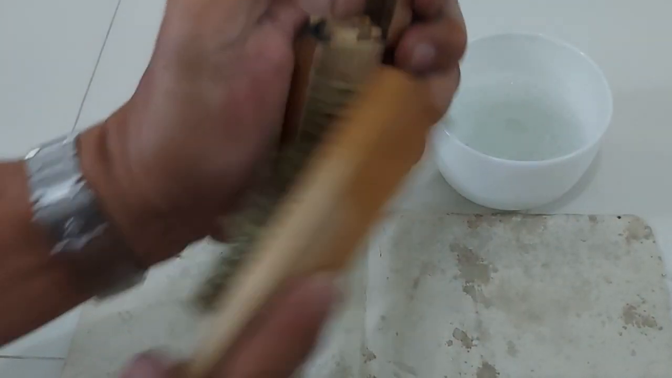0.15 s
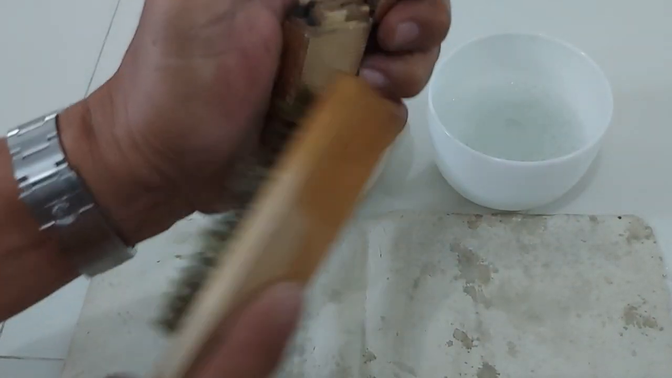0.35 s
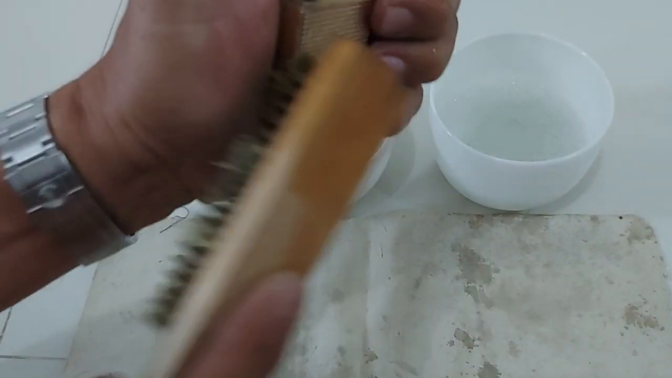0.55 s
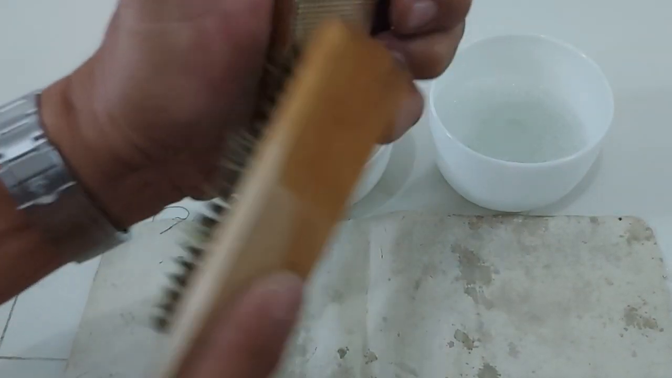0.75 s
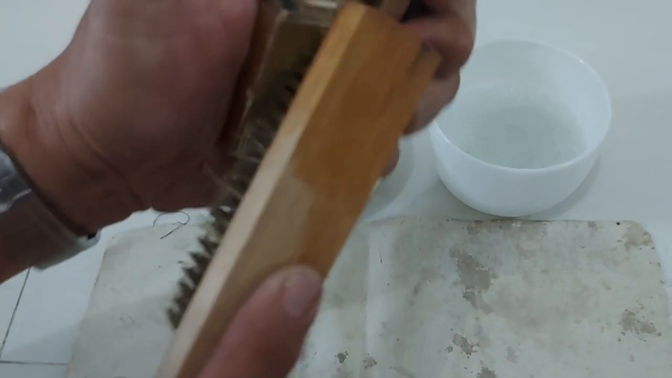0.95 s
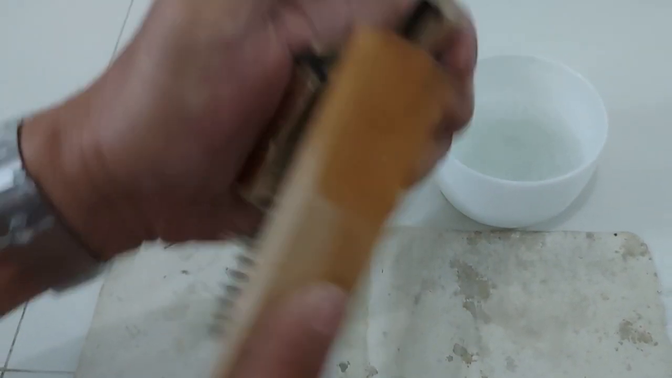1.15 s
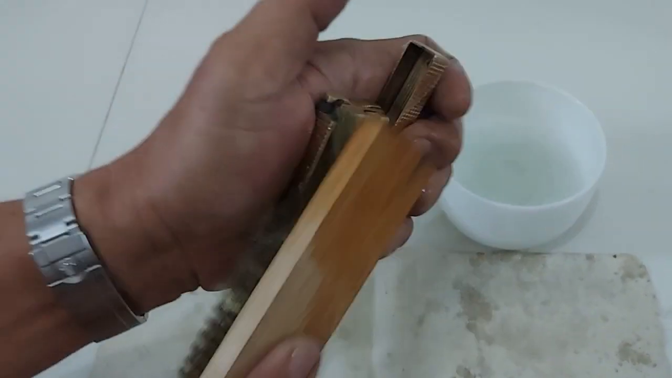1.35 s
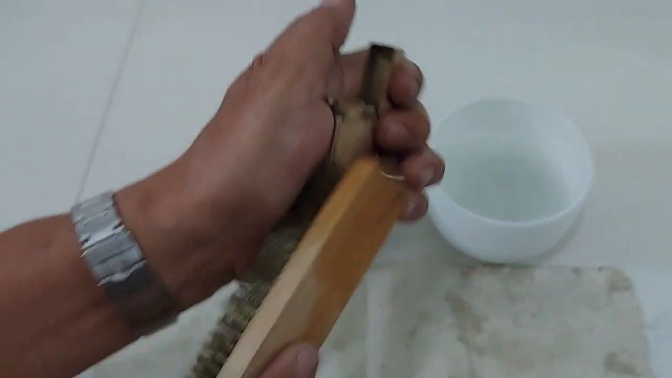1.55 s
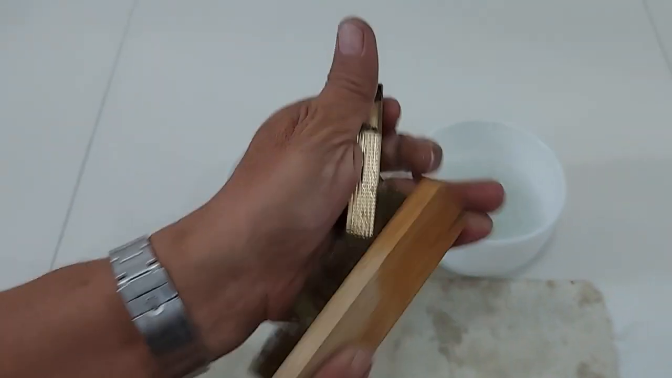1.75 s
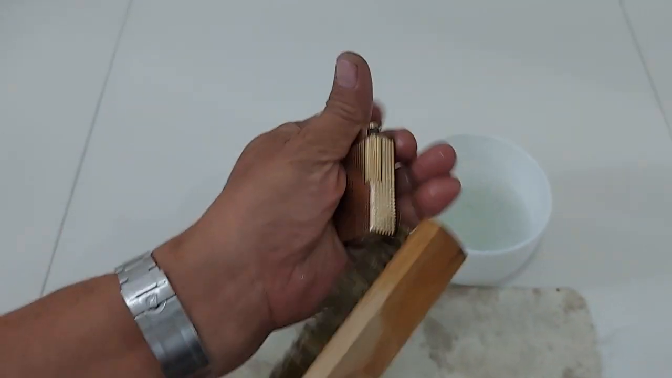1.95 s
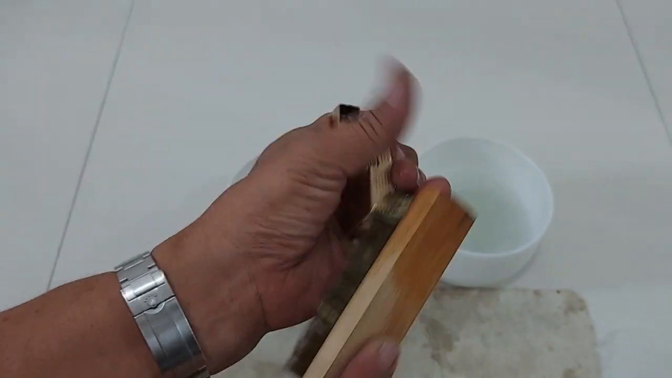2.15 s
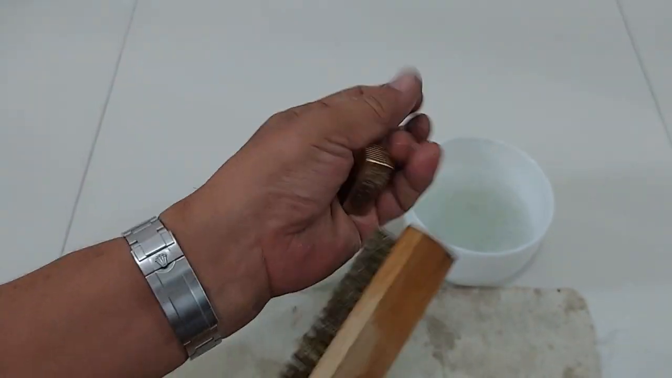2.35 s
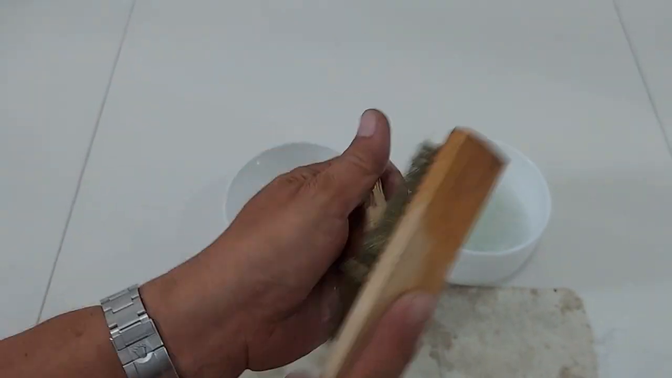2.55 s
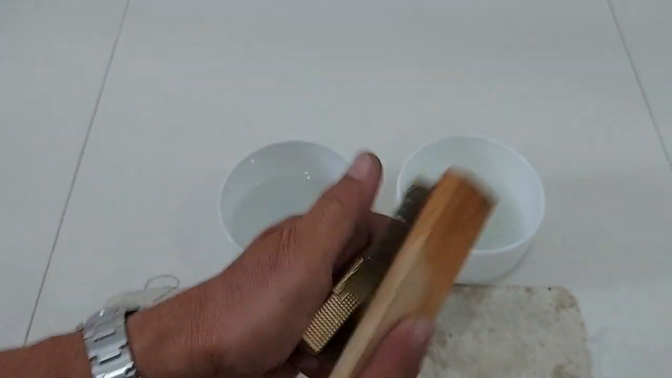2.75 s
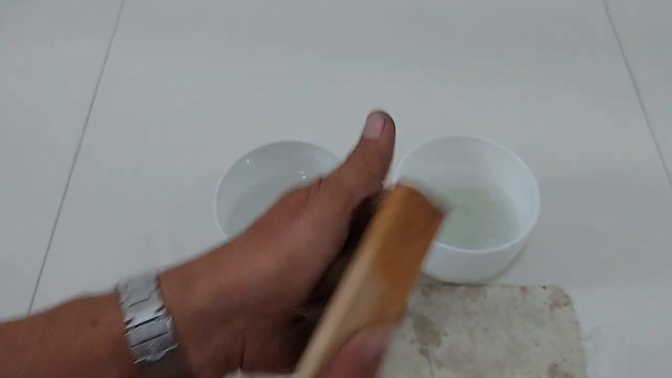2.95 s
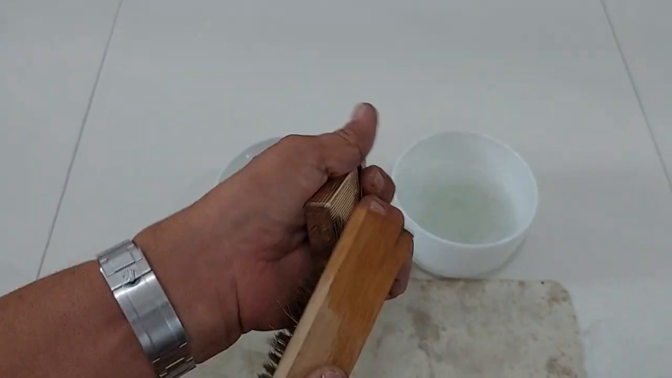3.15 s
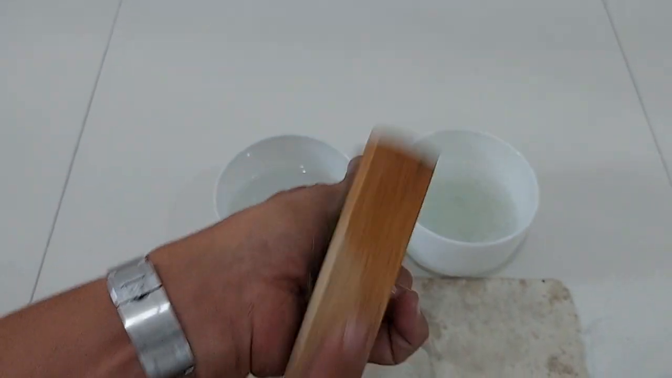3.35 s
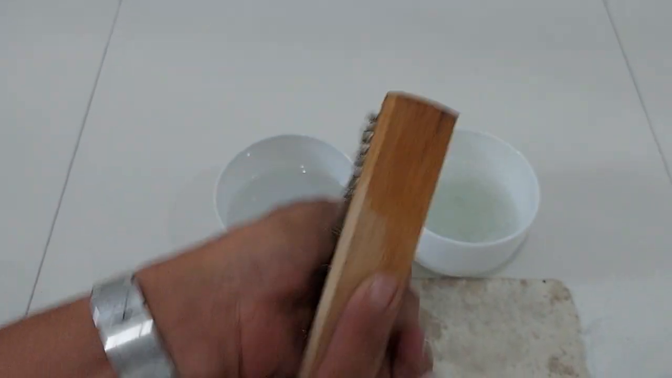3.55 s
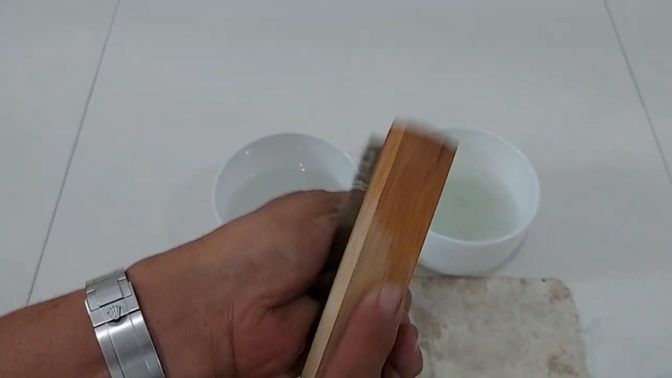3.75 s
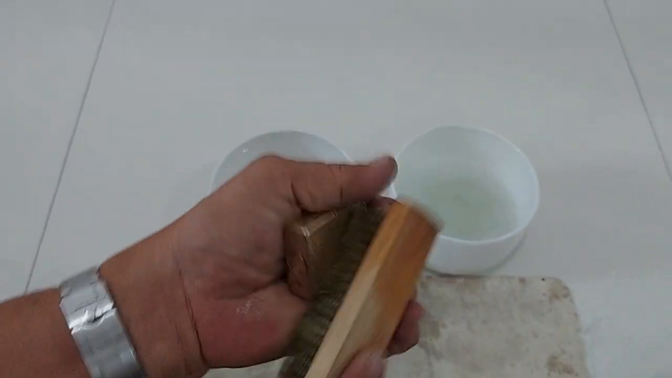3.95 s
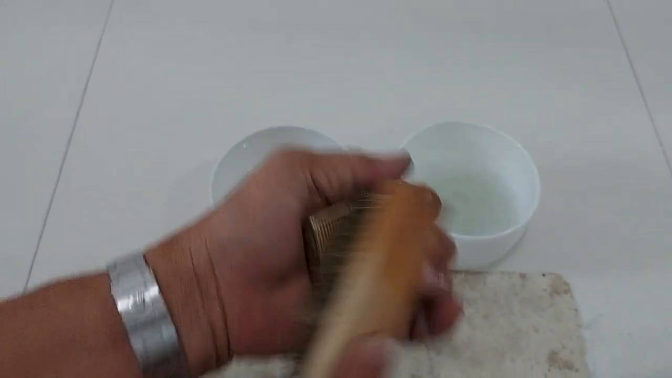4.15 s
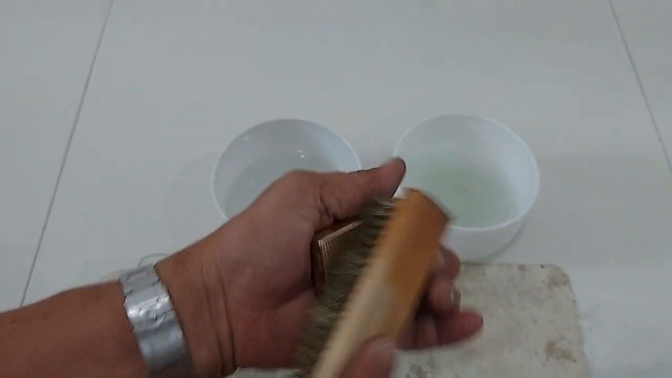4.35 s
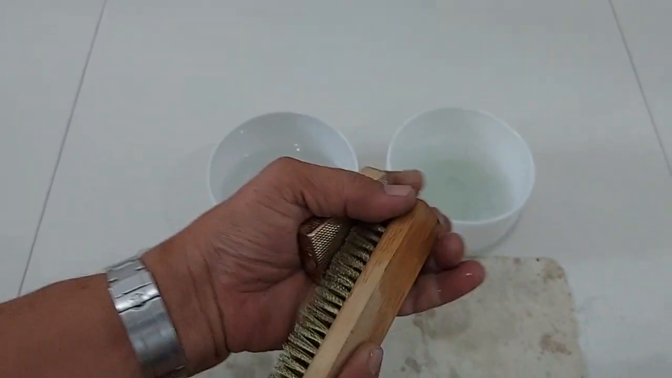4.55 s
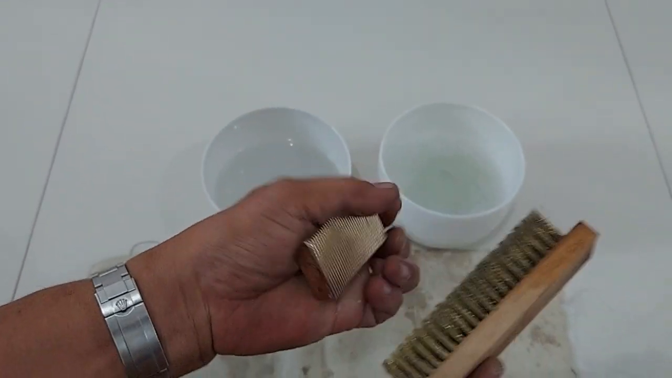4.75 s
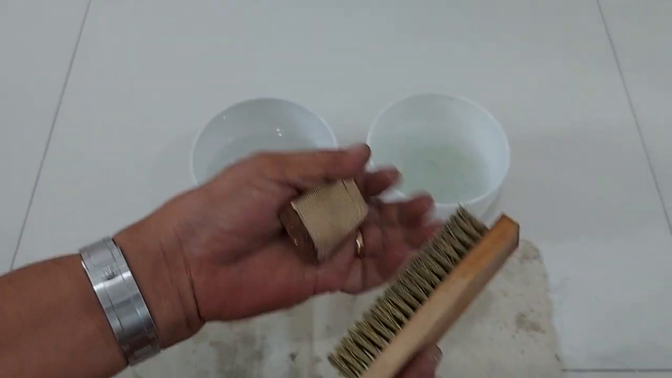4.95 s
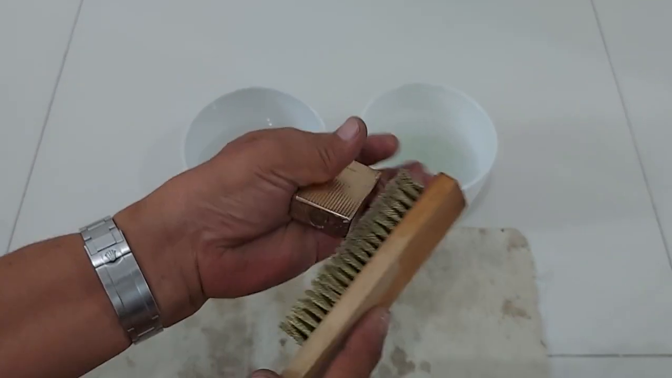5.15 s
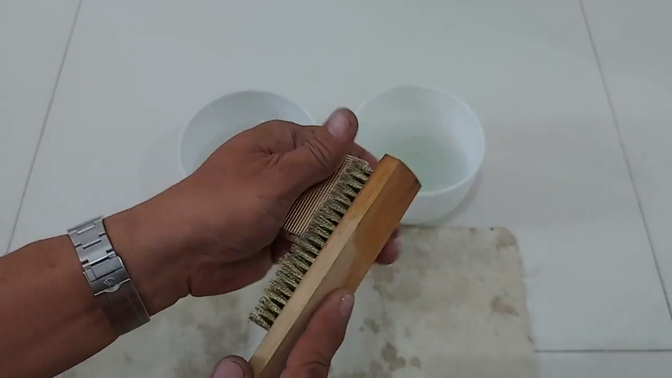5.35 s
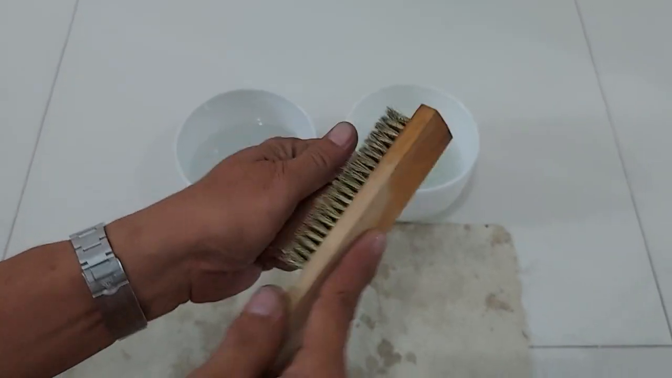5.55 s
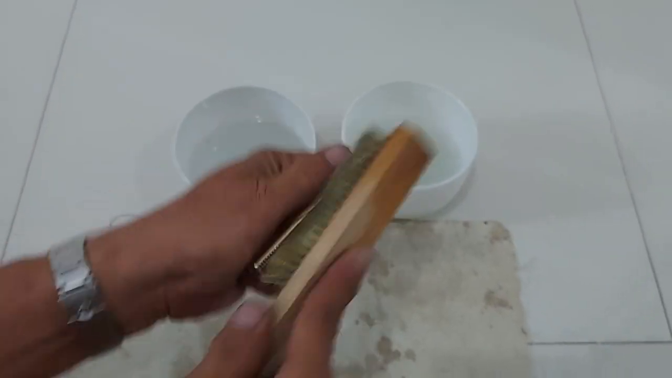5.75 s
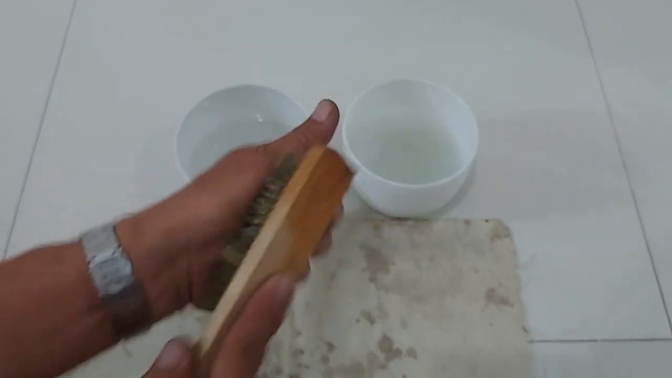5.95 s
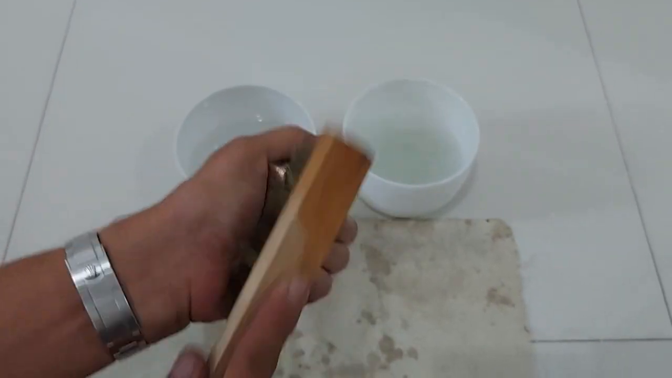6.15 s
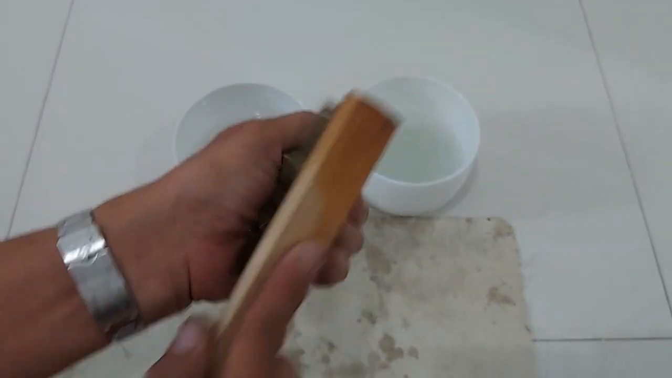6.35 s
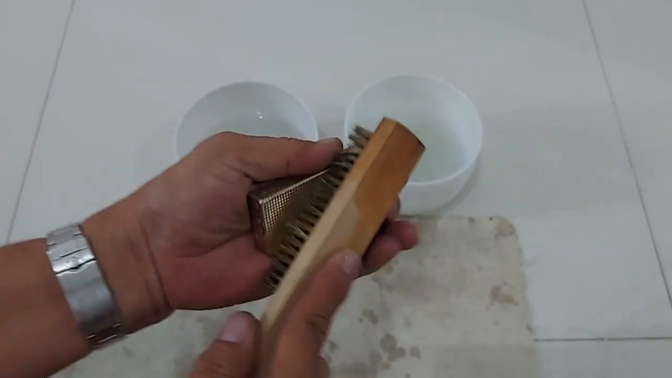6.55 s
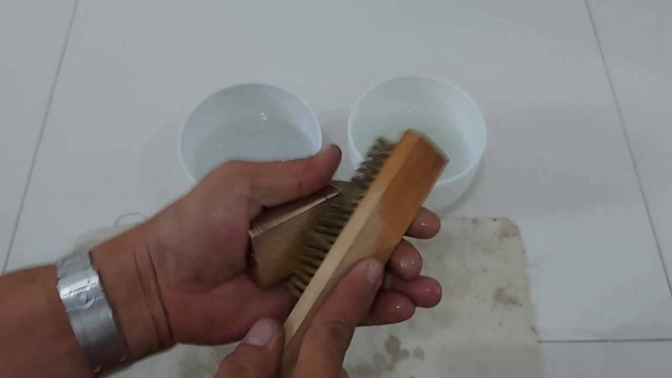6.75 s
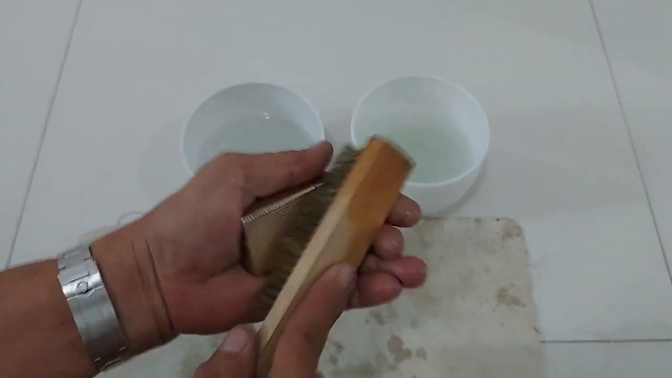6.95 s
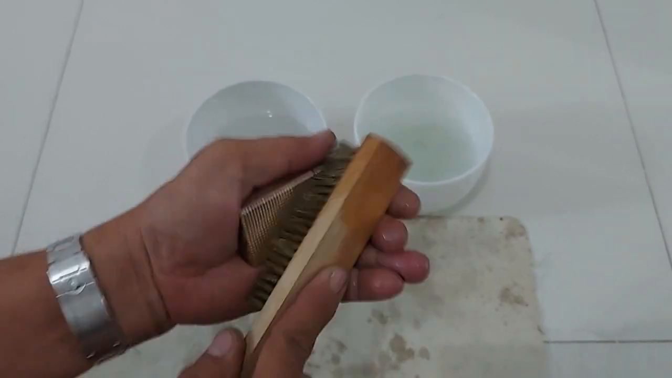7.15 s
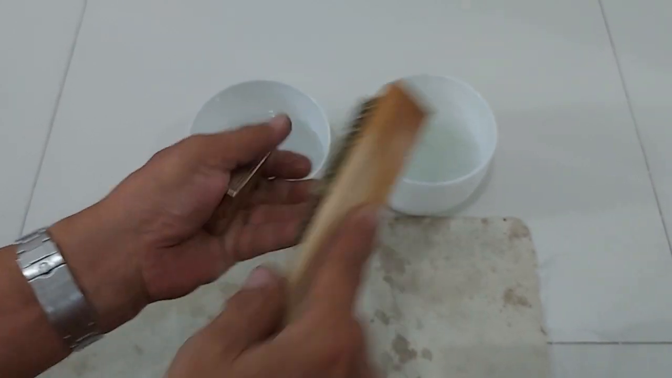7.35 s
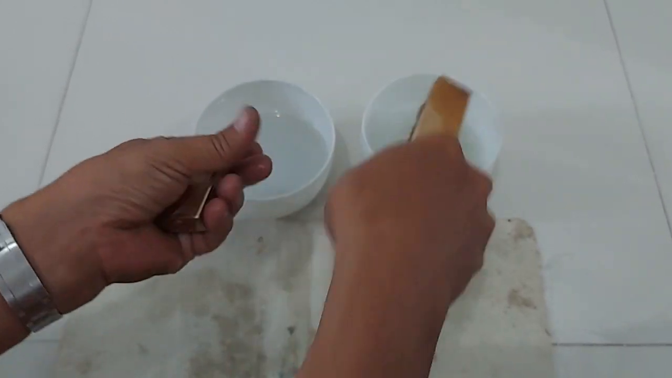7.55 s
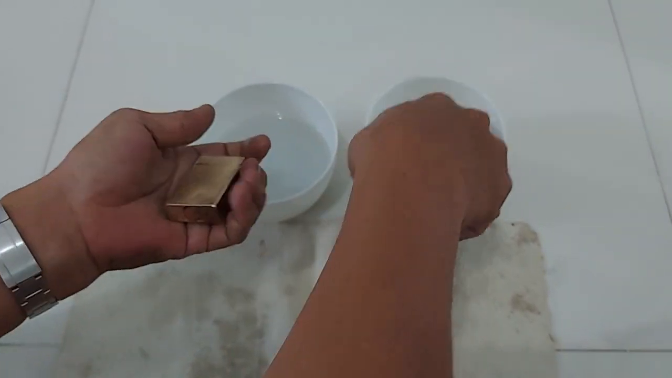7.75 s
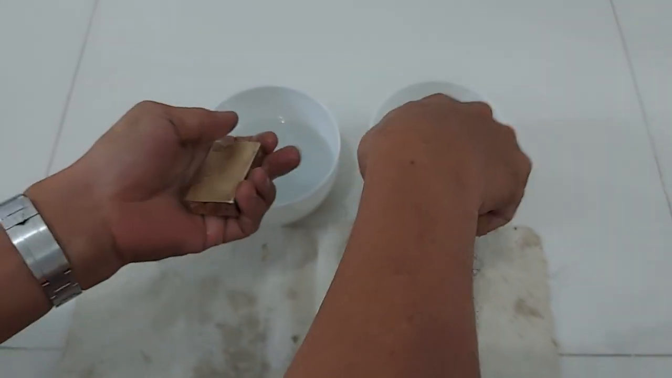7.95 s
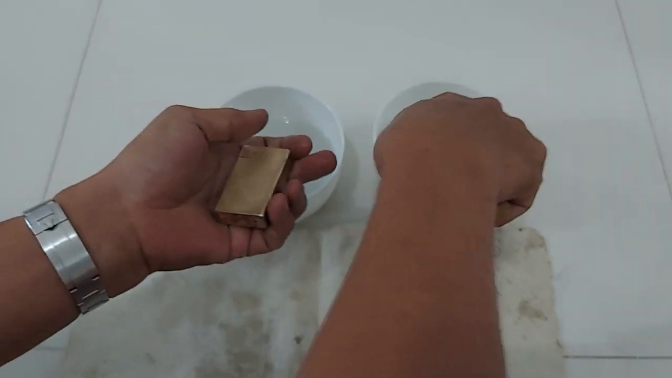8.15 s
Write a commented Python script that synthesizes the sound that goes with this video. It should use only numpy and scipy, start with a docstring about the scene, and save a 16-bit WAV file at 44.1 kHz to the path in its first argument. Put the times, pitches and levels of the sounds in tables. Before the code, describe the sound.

Close stereo sound in a hard, tiled room with a short bright echo; a low, wavering traffic rumble and faint hiss lie behind. From 0 to 2 s a wire brush scrubs a small ribbed metal case in quick, uneven strokes, dry and gritty, with thin ringing around 3 kHz and sharp catches, notably at 0.8 s. Near 2.2 s the strokes break off; a sharp loud crack at 2.3 s leads into a rough fading drag. Scrubbing resumes from 2.75 to 4.6 s, strongest after 4.2 s. A near-silent gap follows, then a tick at 5.2 s and small squeaks. From 5.5 to 7.4 s brisk strokes return, growing louder and ringier, with a hard metallic catch near 7 s. After a pause, from 7.7 s wires clink on ringing glass, and the bowl bumps and grinds hollowly on tiles under a short swelling roar, fading by 8.2 s.

```python
"""In a hard-walled room, a wet wire brush scrubs a small ribbed metal case held in the hand.
Wire tips flick off the ribs in dense swarms of random clicks, which ring the case through resonances.
Catches, snaps, dull taps and thin squeals break in; at the end the brush goes into a glass bowl,
which rings and grinds on the tiles as a noisy roar swells. Outside, traffic rumbles: wavering sine
tones and filtered noise.
"""
import sys
import numpy as np
from scipy import signal
from scipy.fft import rfft, irfft, next_fast_len
from scipy.io import wavfile
from scipy.ndimage import uniform_filter1d

SR = 44100
rng = np.random.default_rng(int(sys.argv[2]) if len(sys.argv) > 2 else 0)


def pcm_store(signal):
    """Save signal as 16-bit PCM."""
    levels = np.round(np.clip(np.atleast_2d(signal), -1, 1) * 32767)
    wavfile.write(sys.argv[1], SR, levels.astype(np.int16).T)


N = 361179
T = np.arange(N) / SR  # time of every sample, in seconds

# Levels in the tables are relative: the functions below trim them further.
# The sound colour of the wire tips. Each row: frequency in Hz, level in dB per Hz.
SCRATCH = [(400, -31), (1200, -20), (2000, -4.5), (4500, -7.5), (5800, -9.5), (7500, -12.5), (9000, -8),
           (11000, -10), (13500, -7), (16000, -7)]


def from_db(db):
    """Turn decibels into a gain to multiply by."""
    return 10 ** (np.asarray(db) / 20)


def rms_one(x):
    """Scale a sound so that its average strength (rms) is 1."""
    return x / np.sqrt(np.mean(x ** 2) + 1e-20)


def in_time(rows, outside=None):
    """Draw straight lines between the rows of a table, giving each column a value at every sample."""
    s, *columns = np.transpose(rows)
    return [np.interp(T, s, column, outside, outside) for column in columns]


def coloured(x, spectrum, share=1):
    """Weight each frequency by a (Hz, dB) curve; share multiplies the decibels."""
    size = next_fast_len(N)
    hz, db = np.transpose(spectrum)
    log_hz = np.log(np.fft.rfftfreq(size, 1 / SR) + 1)
    gain = from_db(share * np.interp(log_hz, np.log(hz), db))
    return irfft(rfft(x, size) * gain, size)[..., :N]


def resonate(x, hz, width_hz):
    """Ring at one frequency, with gain 1 at the peak; a narrower resonance rings longer."""
    r = np.exp(-np.pi * width_hz / SR)
    feed = [(1 - r * r) / 2, 0, (r * r - 1) / 2]
    feedback = [1, -2 * r * np.cos(2 * np.pi * hz / SR), r * r]
    return signal.lfilter(feed, feedback, x + 1e-18)


def drift(rate_hz):
    """Slow random wander of spread 1: noise with everything faster than about rate_hz filtered away."""
    slow = signal.butter(2, rate_hz, fs=SR, output="sos")
    # The first second is dropped so the filter has settled.
    return rms_one(signal.sosfilt(slow, rng.standard_normal(N + SR))[SR:])


def body(x, modes, shift_db=0):
    """Add up resonances of alternating sign; each swells and fades as the contact point moves."""
    total = 0
    for k, (hz, width_hz, db) in enumerate(modes):
        gain = from_db(db + shift_db * drift(9.4))
        total = total + (-1) ** k * gain * resonate(x, hz, width_hz)
    return total


def swarm(per_s, spread_db, channels=1):
    """Many random clicks of uneven size and sign, scaled to rms 1."""
    shape = (channels, N)
    sizes = from_db(spread_db * np.minimum(rng.exponential(1, shape), 5))
    signs = rng.choice([-1, 1], shape)
    happens = rng.random(shape) < per_s / SR
    return rms_one(sizes * signs * happens)


def pair(draws, likeness):
    """Make left and right from three draws: they share the first and own one each."""
    alike = np.clip(likeness, 0, 1)
    return np.sqrt(alike) * draws[0] + np.sqrt(1 - alike) * draws[1:]


def burst(events, t60):
    """Envelope of sudden starts (s, dB), each fading by 60 dB in t60 seconds."""
    out = np.zeros(N)
    for s, db in events:
        out += (T >= s) * from_db(db - 60 * np.clip(T - s, 0, 1) / t60)
    return out


def contact_gains(db, ring_db, hollow_db, bright_db):
    """Turn one contact's levels into gains of dull scratch, bright scratch, case ring and hollow ring."""
    balance_db = np.array([[-bright_db / 2], [bright_db / 2], [ring_db], [hollow_db]])
    return from_db(db + balance_db)


def pressure():
    """Four contact gains over time: each stroke swells, holds and lifts off; overlaps add as power."""
    # Scrubbing strokes. Each row: start in seconds, rise in seconds, length in seconds, scratch level in dB.
    strokes = [(0.0, 0.0013, 0.086, -42.5), (0.077, .045, 0.15, -43), (0.196, 0.018, 0.093, -38),
               (0.294, 0.042, 0.14, -42), (0.409, .029, 0.11, -42.5), (0.507, .027, 0.13, -46),
               (0.629, .012, 0.091, -41.5), (0.714, 0.025, .11, -46), (.813, 0.0089, 0.14, -44.5),
               (0.937, 0.015, 0.086, -52.5), (1.039, 0.052, 0.097, -41), (1.128, .033, .1, -46),
               (1.219, 0.065, 0.11, -38.5), (1.336, 0.04, 0.14, -40), (1.481, 0.038, 0.084, -43),
               (1.552, 0.039, 0.18, -42), (1.702, 0.028, 0.09, -42.5), (1.771, 0.057, 0.21, -45),
               (2.003, .022, 0.064, -53), (2.743, .052, .13, -42.5), (2.866, 0.046, 0.13, -43.5),
               (2.992, 0.044, 0.13, -41.5), (3.12, 0.083, 0.14, -43.5), (3.262, 0.049, 0.13, -45),
               (3.387, .03, 0.12, -48), (3.503, .065, 0.11, -42), (3.615, 0.077, 0.13, -40.5),
               (3.747, 0.037, 0.13, -39.5), (3.885, 0.038, 0.14, -40.5), (3.992, 0.019, 0.098, -40),
               (4.085, 0.074, .11, -40), (4.196, 0.031, 0.12, -34.5), (4.31, 0.028, 0.11, -35.5),
               (4.42, .019, 0.089, -34.5), (4.522, 0.031, .13, -37.5), (5.477, 0.076, 0.18, -42.5),
               (5.641, 0.018, .12, -42), (5.754, 0.032, 0.13, -39.5), (5.865, 0.07, .15, -39.5),
               (6.002, 0.038, 0.17, -46), (6.157, .047, 0.13, -44.5), (6.279, 0.043, 0.12, -43),
               (6.399, 0.052, .13, -41), (6.526, 0.026, 0.12, -37), (6.632, 0.042, 0.11, -38),
               (6.748, 0.057, .1, -36.5), (6.853, 0.023, .1, -37), (6.96, .018, .1, -39.5),
               (7.055, .024, .11, -39.5), (7.158, 0.024, 0.099, -38), (7.263, 0.04, 0.081, -44.5),
               (7.387, 0.045, 0.073, -57)]
    # How freely the held case sounds. Each row: time in seconds, case ring against scratch in dB,
    # hollow ring against scratch in dB, brightness in dB.
    grip_rows = [(0.0, -1.5, -13, 2), (.9, -1.5, -12.5, 1.5), (1.6, -3.5, -10, -0.5), (1.9, -8.5, -12, 3),
                 (2.8, -3.5, -15.5, 1), (3.7, -4.5, -3, 3), (4.3, -7, -14.5, 0), (5.6, -2.5, -3, 4),
                 (6.5, -3, -10.5, 2.5), (7.1, 0.5, 1, 5), (7.4, -3.5, 2.5, 5)]
    # Slow drags between the strokes. Each row: start in seconds, length in seconds, first level in dB,
    # last level in dB, case ring against scratch in dB, hollow ring against scratch in dB, brightness in dB.
    drags = [(2.182, 0.047, -40, -71, 5.5, 5, -6), (2.235, 0.097, -52.5, -48, 2, 1.5, 2.5),
             (2.348, 0.28, -30.5, -47.5, -4, 5, -4), (2.625, 0.12, -51, -53.5, 0, 2.5, -1),
             (5.17, 0.15, -69, -72.5, -14, -22, -13), (5.27, 0.035, -42.5, -71, -1, -3, -5),
             (5.301, 0.2, -53.5, -51.5, 7.5, 0, -3)]
    lift_share = 0.38  # last part of a stroke, spent lifting off
    spread_db = 2  # stroke-to-stroke change of both rings and brightness
    drag_edge_s = 0.0079

    power = np.zeros((4, N))
    grip = np.array(in_time(grip_rows))
    chances = rng.standard_normal((len(strokes), 3))
    for (s, rise, length, db), chance in zip(strokes, chances):
        at = slice(int(s * SR), int((s + length) * SR))
        swell = (T[at] - s) / rise
        lift = (s + length - T[at]) / (lift_share * length)
        shape = np.clip(np.minimum(swell, lift), 0, 1)
        ring_db, hollow_db, bright_db = grip[:, at.start] + spread_db * chance
        power[:, at] += (shape * contact_gains(db, ring_db, hollow_db, bright_db)) ** 2
    for s, length, first_db, last_db, ring_db, hollow_db, bright_db in drags:
        shape = np.clip(np.minimum(T - s, s + length - T) / drag_edge_s, 0, 1)
        db = np.interp(T, [s, s + length], [first_db, last_db])
        power += (shape * contact_gains(db, ring_db, hollow_db, bright_db)) ** 2
    return np.sqrt(power)


def brush():
    """Wire tips click off the ribs; the same flicks ring the case and hollow, while other wires sing."""
    # A tuft catches the edge of the case. Each row: time in seconds, level in dB.
    catches = [(0.2099, -48), (0.643, -39), (0.84, -26.5), (1.0737, -32), (1.3644, -36), (2.5097, -26),
               (2.757, -41), (3.3546, -38), (3.413, -36), (3.7629, -59), (4.2127, -28), (4.4347, -29.5),
               (5.2774, -38.5), (5.7668, -35), (6.1864, -41), (6.544, -38), (6.772, -28), (6.976, -20.5),
               (7.0742, -34), (7.178, -25)]
    # Ringing of the wires. Each row: frequency in Hz, width in Hz, level in dB.
    wire_modes = [(5220, 200, -3), (6390, 300, -7), (9100, 300, -5), (11200, 600, -2), (12300, 400, -6),
                  (14900, 700, -4)]
    # Ringing of the case. Each row: frequency in Hz, width in Hz, level in dB.
    case_modes = [(2381, 260, -5), (2898, 110, 1), (3055, 139, -0.5)]
    # Extra ringing of the case in the later strokes. Each row: frequency in Hz, width in Hz, level in dB.
    extra_modes = [(3780, 77, -19), (4330, 1400, -22)]
    # Brush back and the air between case and palm. Each row: frequency in Hz, width in Hz, level in dB.
    hollow_modes = [(607, 34, -17), (986, 51, -15), (1630, 134, -3.5), (1980, 245, 6.5)]
    likeness = 0.4  # shared part of the power in left and right
    extra_from_s = 4.15  # from when the extra ringing may sound
    bright_hz = 7400  # split between dull and bright scratch

    dull, bright, ring, hollow = pressure()
    tips = pair(swarm(11000, 2.5, channels=3), likeness) * from_db(0.9 * drift(60))
    twangs = pair(swarm(6000, 4.7, channels=3), likeness)  # other wires spring back and sing
    singing = rms_one(body(twangs, wire_modes, shift_db=4.0))
    scratch = rms_one(coloured(tips, SCRATCH)) + from_db(-8) * singing
    top = signal.sosfilt(signal.butter(4, bright_hz, "high", fs=SR, output="sos"), scratch)
    low = signal.sosfilt(signal.butter(4, bright_hz, fs=SR, output="sos"), scratch)

    # The wires of a tuft let go over about 2 ms.
    catch = uniform_filter1d(burst(catches, 0.035), size=90, origin=44)
    modes = body(tips, case_modes, shift_db=3.5)
    modes = modes + (T > extra_from_s) * body(tips, extra_modes, shift_db=7.0)
    case = rms_one(modes) * (ring * from_db(-2.5) + catch * from_db(-6.0))
    air = rms_one(body(tips, hollow_modes, shift_db=3.5))
    air = air * (hollow * from_db(-8.5) + catch * from_db(-12.5))
    dull_scratch = low * (dull * from_db(0.5) + catch * from_db(-11.5))
    bright_scratch = top * bright * from_db(-1.5)
    return dull_scratch + bright_scratch + case + air


def traffic_and_roar():
    """Sine waves make an engine drone and a faint hum; filtered noise makes low rumble and a roar."""
    # Engine outside. Each row: time in seconds, drone pitch in Hz (wanders further), drone level in dB,
    # level of its octave in dB.
    drone_rows = [(0.0, 64.7, -77, -70), (.25, 68, -53, -54), (.45, 66.67, -66, -75),
                  (1.05, 72.5, -83, -77), (1.5, 67.4, -49, -66), (2.05, 66.14, -64, -81),
                  (2.6, 63.2, -65, -69), (3.08, 62.2, -54, -51), (3.56, 62.4, -84, -49),
                  (3.7, 74.4, -55.5, -72), (3.85, 74.64, -47.5, -66), (4.17, 72.3, -65, -73),
                  (4.33, 78.03, -48, -73), (4.78, 74.75, -49.5, -67), (4.9, 71.2, -54.5, -65.5),
                  (4.98, 69.87, -47.5, -67.5), (6.16, 68.5, -54.5, -65.5), (6.85, 64.56, -63, -67),
                  (7.0, 65.1, -52, -65.5), (7.7, 64.95, -55.5, -57), (8.19, 67.1, -52, -46.5)]
    # Low noise. Passing traffic, then a late roar swelling as the bowl grinds.
    # Each row: time in seconds, rumble level in dB, roar level in dB.
    low_noise = [(0.0, -62, -60), (.25, -57.5, -59), (.4, -56.5, -68.5), (1.0, -57, -71),
                 (1.3, -51.5, -64.5), (2.05, -59.5, -75.5), (2.9, -60, -71.5), (3.65, -60.5, -67),
                 (3.85, -50.5, -63.5), (4.35, -55, -72), (4.7, -52.5, -60), (5.05, -61, -72),
                 (6.85, -62, -70.5), (7.0, -55, -69.5), (7.66, -59.5, -71), (7.9, -53, -44),
                 (8.19, -55.5, -55.5)]
    # Engine overtones. Each row: multiple of a third of the drone pitch, level against the rumble in dB.
    engine = [(2, -8), (4, -7), (5, -6), (8, -14), (9, -14)]
    # Colour of the low rumble. Each row: frequency in Hz, level in dB per Hz.
    rumble_colour = [(15, -43.5), (25, -39), (54, -3.5), (71, -5), (120, -5), (156, -13), (237, -18.5),
                     (325, -30.5), (400, -27), (520, -53.5), (880, -120)]
    # Colour of the roar. Each row: frequency in Hz, level in dB per Hz.
    roar_colour = [(150, -32), (250, -9), (380, -16.5), (400, -17.5), (576, -14.5), (955, -22), (1060, -22),
                   (1330, -27), (16000, -54.5)]
    hum_hz, hum_db = 235, -75  # centres; both wander

    hz, drone_db, octave_db = in_time(drone_rows)
    rumble_db, roar_db = in_time(low_noise) + 1.5 * drift(6.0)
    phase = 2 * np.pi * np.cumsum(hz + 1.025 * drift(3.63)) / SR
    phase = phase + np.array([[0.3], [-0.3]])  # left and right are out of step
    drone = np.sin(phase) * from_db(drone_db + 2.0 * drift(12))
    drone += np.sin(2 * phase) * from_db(octave_db - 8.0)
    for k, db in engine:
        drone += np.sin(k * phase / 3) * from_db(rumble_db + db - 3.0 + 5.15 * drift(2.02))
    hum_phase = 2 * np.pi * np.cumsum(hum_hz + 3.0 * drift(3)) / SR
    drone += np.sin(hum_phase) * from_db(hum_db + 2.5 * drift(2.5))

    rumble_noise = pair(rng.standard_normal((3, N)), 0.85)
    rumble = rms_one(coloured(rumble_noise, rumble_colour)) * from_db(rumble_db + 2.0)
    roar_noise = pair(rng.standard_normal((3, N)), 0.25)
    roar = rms_one(coloured(roar_noise, roar_colour)) * from_db(roar_db - 1.5)
    return (np.sqrt(2) * drone + rumble) * from_db([[-1.5], [1.5]]) + roar


def thuds():
    """Low thuds through the hands: about one slow cycle of a sine under a bell-shaped swell."""
    # Each row: centre time in seconds, level in dB.
    thud_rows = [(0.301, -48), (2.347, -48.5)]
    hz = 45
    out = np.zeros(N)
    for s, db in thud_rows:
        swell = np.exp(-0.5 * ((T - s) * hz * 2) ** 2)
        out += from_db(db) * np.sin(2 * np.pi * hz * (T - s)) * swell
    return out


def taps():
    """Dull taps of the wooden brush back: a single click softened by two wide resonances."""
    # Each row: time in seconds, level in dB.
    tap_rows = [(1.552, -43.5), (2.333, -63), (3.369, -56), (3.413, -54.5), (3.507, -56)]
    push = np.zeros(N)
    for s, db in tap_rows:
        push[round(s * SR)] = from_db(db + 32)  # raised, as the resonances spread the click out
    return resonate(resonate(push, 650, 900), 700, 1500)


def snaps():
    """Short broad cracks: fading noise with a bright band at its centre."""
    # Each row: time in seconds, level in dB, centre of the band in Hz (held to 15500 at most),
    # time to fade by 60 dB in seconds, left against right in dB.
    snap_rows = [(1.7205, -30, 11930, 0.096, 0), (2.1848, -43.5, 7800, 0.052, -1.5),
                 (2.335, -7.5, 16000, 0.031, -4), (4.871, -73, 4874, 0.042, 8),
                 (4.9813, -71, 5017, 0.059, -8), (5.0472, -68, 6420, 0.06, 3.5),
                 (5.1637, -37.5, 7000, 0.037, 1.5), (7.4376, -56, 7020, 0.07, -14)]
    out = np.zeros((2, N))
    noise = pair(rng.standard_normal((3, N)), 0.12)
    crack = rms_one(coloured(noise, SCRATCH))
    for s, db, hz, t60, pan_db in snap_rows:
        tone = crack + 3.6 * resonate(noise, min(hz, 15500), 0.047 * hz)
        out += tone * burst([(s, db - 5)], t60) * from_db([[pan_db / 2], [-pan_db / 2]])
    return out


def squeals():
    """Thin wavering tones: a gliding sine and cosine, each shaken in strength by slow noise."""
    # Each row: start in seconds, length in seconds, start pitch in Hz, end pitch in Hz,
    # speed of the shaking in Hz, level in dB.
    squeal_rows = [(2.225, 0.084, 3490, 3710, 200, -44), (3.938, 0.074, 5267, 5300, 150, -47),
                   (5.308, 0.085, 3726, 3350, 170, -41.5), (5.312, 0.035, 726, 728, 37, -68.5),
                   (5.439, 0.02, 3956, 3910, 91, -34.5), (5.47, 0.049, 2695, 2720, 31, -45),
                   (5.471, 0.223, 3975, 3870, 110, -48.5), (6.678, 0.29, 623.7, 646, 2.6, -73.5),
                   (7.195, 0.23, 1670, 1670, 29, -63.5), (7.743, .058, 853, 733, 47, -52.5)]
    out = np.zeros((2, N))
    for s, length, start_hz, end_hz, width_hz, db in squeal_rows:
        hz = np.interp(T, [s, s + length], [start_hz, end_hz])
        phase = 2 * np.pi * np.cumsum(hz) / SR
        fade_db = -130 * np.clip(T - s - length, 0, 1)
        shape = np.clip((T - s) / 0.005, 0, 1) * from_db(db + fade_db)
        for side in out:
            side += shape * (drift(width_hz) * np.sin(phase) + drift(width_hz) * np.cos(phase))
    return out


def bowl():
    """Wires rub and strike the glass, which rings; the foot of the bowl grinds and bumps on the tiles."""
    # Brush in the bowl. Each row: time in seconds, wires on glass in dB, bowl grinding on tiles in dB.
    dip = [(7.69, -79, -67), (7.724, -53.5, -58), (7.816, -43.5, -47), (7.836, -57, -28), (7.868, -49, -40),
           (7.894, -34, -36), (7.93, -48.5, -32), (8.098, -61, -49.5), (8.118, -42, -41), (8.19, -67, -68)]
    # Wires meet the glass. Each row: time in seconds, level in dB.
    clinks = [(7.7155, -51), (7.7242, -36), (7.735, -46), (7.7797, -43), (7.882, -41), (7.9714, -60),
              (8.1039, -48.5), (8.117, -37.5)]
    # Ringing of the glass. Each row: frequency in Hz, level in dB, nominal time to fade by 60 dB in seconds.
    glass_rows = [(1626, 1, .5), (2837, -1, .4), (4387, 1, .18), (6234, -8, .09), (8340, -18, .06),
                  (9895, -10, .08), (10800, -15, .06), (11840, -18, .06), (12850, -20, .05),
                  (14300, -19, .05), (15500, -21, .05)]
    # Bowl bumps the tiles. Each row: earliest time in seconds, level in dB.
    bumps = [(7.752, -48), (7.826, -27.5), (7.839, -28.5), (7.875, -26.5), (7.922, -23.5), (7.932, -29.5),
             (7.95, -35), (7.984, -39), (8.045, -36.5), (8.085, -38.5)]
    # Ringing of bowl on tiles. Each row: frequency in Hz, width in Hz (bumps use 1.04 times it), level in dB.
    grind_modes = [(253, 12, -11), (380, 35, -2.5), (538, 126, -12), (563.8, 25.86, -1.5), (699.5, 94, -2),
                   (888, 58.6, 1.5), (957.8, 34, -5.5), (1041, 22.7, 0), (1134, 50, -2), (1228, 76, -2.5),
                   (1581, 179, -11), (1940, 36, -11)]
    soft_foot_hz = 2300

    rub_db, grind_db = in_time(dip, outside=-120)
    rub = from_db(rub_db) + burst(clinks, 0.03) * from_db(9.0)
    wires = swarm(4000, 3.0, channels=2) * rub
    # A width of 2.64 / t60 makes the glass fade a little faster than its nominal time.
    glass_modes = [(hz, 2.64 / t60, db) for hz, db, t60 in glass_rows]
    glass = 11.6 * body(wires, glass_modes)
    scrape = rms_one(coloured(swarm(3500, 2.95, channels=2), SCRATCH)) * rub

    grit = pair(swarm(700, 3.5, channels=3), 0.55)
    grind_gain = from_db(grind_db - 5.0 + 2.5 * drift(30))
    grind = rms_one(body(grit, grind_modes, shift_db=3.0)) * grind_gain
    # Every bump strikes each mode with a strength and small delay of its own.
    for hz, width_hz, db in grind_modes:
        knocks = np.zeros(N)
        chances = rng.standard_normal((len(bumps), 2))
        for (s, bump_db), chance in zip(bumps, chances):
            at = round((s + 0.003 * abs(chance[0])) * SR)
            knocks[at] = from_db(bump_db + db - 11.5 + 3.0 * chance[1])
        # Narrow resonances answer a click more weakly, so they are raised.
        grind = grind + resonate(knocks, hz, 1.04 * width_hz) * SR / (3.55 * width_hz)
    # The wet foot makes soft contacts, with little treble.
    grind = signal.sosfilt(signal.butter(4, soft_foot_hz, fs=SR, output="sos"), grind)
    return glass + from_db(-10) * scrape + grind


def room(x):
    """Dense fading echoes, different on each side; the walls make the treble fade sooner."""
    t60_s, wall_cut_hz = 0.61, 7400
    t = T[:SR]
    noise = rng.standard_normal((2, SR)) * np.clip(t / 0.0023, 0, 1)
    dull = signal.sosfilt(signal.butter(2, wall_cut_hz, fs=SR, output="sos"), noise)
    echoes = dull * from_db(-60 * t / t60_s)
    echoes = echoes + (noise - dull) * from_db(-60 * t / (0.65 * t60_s))
    echoes = echoes / np.sqrt(np.sum(echoes ** 2, axis=1, keepdims=True))
    return signal.fftconvolve(x, echoes, axes=1)[:, :N]


def left_leads(x, lead):
    """Shift the right side in time by turning its phase; a positive lead makes the right later."""
    size = next_fast_len(N + 512)
    phase = np.interp(np.fft.rfftfreq(size, 1 / SR), *np.transpose(lead))
    right = irfft(rfft(x[1], size) * np.exp(-1j * phase), size)[:N]
    return np.array([x[0], right])


def scene():
    """Place brush and bowl between left and right, then add room echoes, traffic, roar, thuds and hiss."""
    # Left against right for the hands. Each row: frequency in Hz, shading in dB (scaled for each side below).
    shade = [(60, 21), (110, -17.5), (200, -10.5), (380, -1.5), (700, -5.5), (1290, -6.5), (2380, -5.5),
             (4400, 1.5), (8120, -0.5), (15000, 3.5)]
    # How far left leads right for the hands. Each row: frequency in Hz, lead in radians.
    hands_lead = [(0, 0), (780, .3), (2330, 1.9), (3190, 3.8), (5430, 9.9), (9130, 27.4), (16600, 42)]
    # How far left leads right for the bowl. Each row: frequency in Hz, lead in radians.
    bowl_lead = [(0, 0), (1290, -1.6), (3620, 3.9), (16600, 20)]
    room_db, hiss_db = -7, -78

    left, right = brush() + snaps() + taps() + squeals()
    hands = np.array([coloured(left, shade, share=0.71), coloured(right, shade, share=-0.5)])
    near = left_leads(hands, hands_lead)
    near = near + left_leads(bowl() * from_db([[-1.2], [1.2]]), bowl_lead)
    hiss = from_db(hiss_db) * rng.standard_normal((2, N))
    return near + from_db(room_db) * room(near) + traffic_and_roar() + thuds() + hiss


def record(dry):
    """Cut the top steeply: from 16200 Hz up, everything is at least 70 dB down."""
    return signal.sosfilt(signal.cheby2(22, 70, 16200, fs=SR, output="sos"), dry)


dry = scene()
out = record(dry)
pcm_store(out)
```